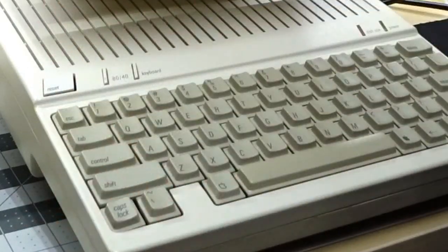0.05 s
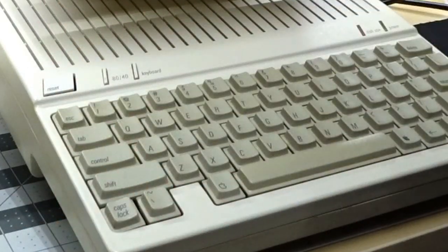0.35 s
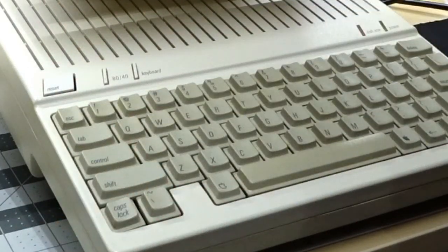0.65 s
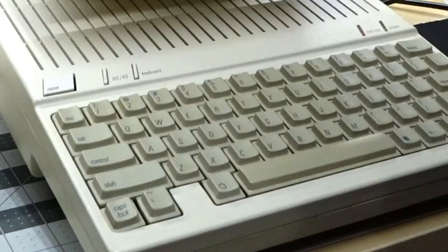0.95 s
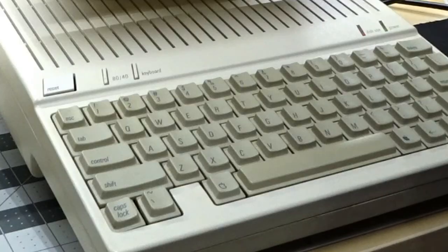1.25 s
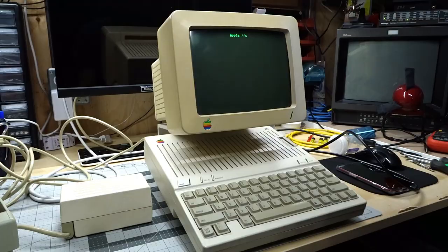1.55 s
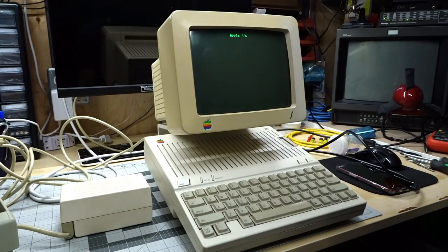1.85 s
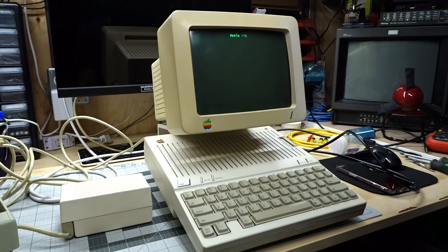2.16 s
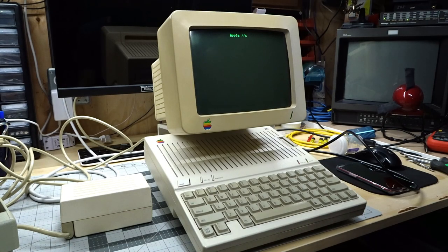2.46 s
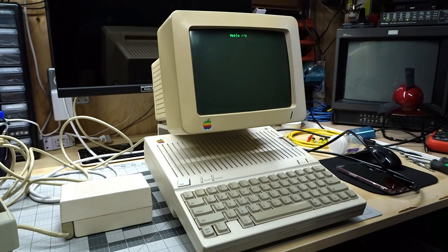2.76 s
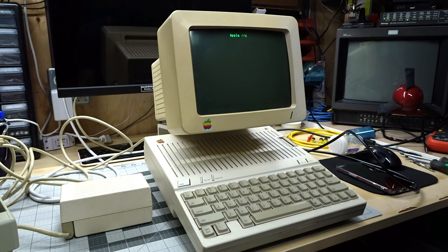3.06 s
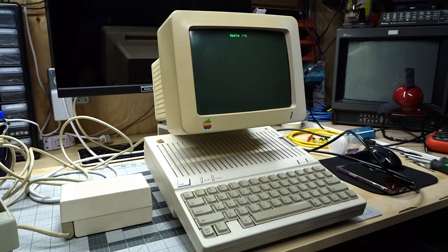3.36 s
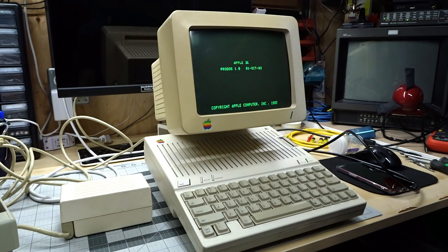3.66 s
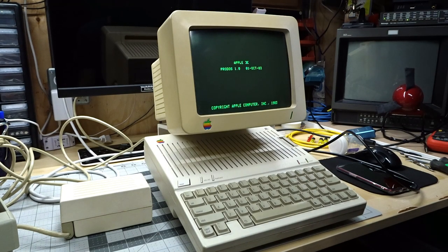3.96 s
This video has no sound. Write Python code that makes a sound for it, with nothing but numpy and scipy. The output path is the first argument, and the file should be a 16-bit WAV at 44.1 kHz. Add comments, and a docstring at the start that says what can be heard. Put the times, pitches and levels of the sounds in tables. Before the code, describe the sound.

Rapid mechanical knocking from an old computer's disk drive stops, leaving a faint hum.

```python
"""A floppy drive knocks its head against the end stop thirteen times a second. Each knock rings the
plastic case and is followed by a lighter click as the stepper slips back. Then the disk just spins with
a low hum; the head slides softly from track to track and clicks twice, between a low bump and a faint
rustle. Small, dry workshop: steady noise, desk reflections, faint reverberation."""
import sys
import numpy as np
from scipy import signal
from scipy.fft import rfft, irfft
from scipy.io import wavfile
from scipy.ndimage import uniform_filter1d

SR = 44100
rng = np.random.default_rng(int(sys.argv[2]) if len(sys.argv) > 2 else 0)


def transcribe(u):
    """Save the signal u as a 16-bit wav file named by the first command-line argument.

    u: samples, shape (n,) or (channels, n), limited to [-1, 1]; the rate is SR.
    q: integer samples, one column per channel.
    """
    v = np.clip(np.atleast_2d(u).T, -1, 1)
    q = np.round(v * 32767).astype(np.int16)
    wavfile.write(sys.argv[1], SR, q)


N = 176400

# drive and case modes (frequency [Hz], knock level [dB], slip level [dB], t60 [s], rise [s])
BODY_MODES = [(178, -83, -88, 0.13, 0.0067), (309.4, -48, -65, 0.22, 0.0076),
              (407.2, -39, -78, 0.13, 0.0055), (702.4, -34.5, -56, 0.19, 0.0098),
              (776, -44.5, -52, .1, 0.0061), (816.6, -47, -47, 0.18, 0.0091), (878, -61, -52, 0.049, 0.018),
              (962.5, -35, -67, 0.043, 0.0035), (1044.3, -36.5, -35.5, 0.11, 0.009),
              (1585, -37.5, -48, 0.066, 0.0086), (1648, -75, -40, 0.064, 0.0024),
              (2648, -44, -52, 0.095, 0.00065), (2970, -48.5, -64, 0.081, 0.00085),
              (3060, -35, -64, 0.053, 0.0017), (3260, -24, -44, 0.025, 0.0011),
              (3482, -45.5, -54.5, 0.022, 0.00042), (3950, -38.5, -49, 0.045, 0.00082),
              (4354, -40.5, -53, 0.054, 0.0015), (5230, -66, -47.5, 0.023, 0.00042),
              (5645, -47.5, -41, 0.02, 0.00041), (7590, -31, -67, 0.0069, 0.00013)]
# dense ring spectra (frequency [Hz], relative density [dB])
KNOCK_SPECTRUM = [(100, -29), (230, -11.5), (450, -4.5), (600, -4), (850, 5.5), (1080, 1.5), (1250, -9.5),
                  (1500, 1), (2000, -10), (2600, -5), (3200, -7.5), (4200, -2), (4800, -15.5), (5600, -7.5),
                  (6900, -22), (7900, -11), (9300, -14), (11000, -20.5)]
SLIP_SPECTRUM = [(100, -10.5), (250, -13.5), (480, 2.5), (620, 0.5), (900, 6), (1250, 1), (1650, 2.5),
                 (2100, -0.5), (3000, -0.5), (4100, 6.5), (4800, 0.5), (5600, 1.5), (6600, -5),
                 (7400, -4.5), (8500, -10.5), (11000, -13)]
CLICK_SPECTRUM = [(200, -15), (1200, -5), (1800, -19), (2300, -1), (3300, -5.5), (3900, -16.5),
                  (4500, -8.5), (5300, -29), (11000, -26)]
# dense ring decay by band (frequency [Hz], t60 [s], rise [s])
CASE_DECAY = [(306, 0.18, 0.015), (850, 0.091, 0.0017), (1600, 0.15, .003), (3320, 0.15, 0.00051),
              (5700, 0.088, 0.001), (10000, 0.13, 0.0009)]
CLICK_DECAY = [(500, .05, 0.00056), (4000, 0.07, 0.00012)]
# part of the ring that changes per blow (frequency [Hz], power share [0-1])
BLOW_VARIATION = [(500, .06), (3000, 0.041), (9000, 0.28)]
# tones of the spinning drive (frequency [Hz], rms level [dB])
SPIN_TONES = [(119, -82), (177.6, -74.5), (480, -84.5), (775, -84), (2353, -90.5), (2460, -82.5),
              (3192, -86), (4554, -88)]
# track-to-track moves (centre time [s], length [s], level [dB])
HEAD_SLIDES = [(1.545, 0.099, -64), (1.855, 0.18, -68), (2.327, 0.044, -61.5), (2.792, 0.081, -62),
               (3.263, 0.096, -62.5)]
# double click (time [s], tick level [dB], rattle level [dB], ring level [dB])
HEAD_CLICKS = [(3.6011, -40, -63.5, -44), (3.6187, -45, -65.5, -43)]
# noise and echo spectra (frequency [Hz], relative density [dB])
FLOOR_SPECTRUM = [(15, -30), (25, -5), (70, -8), (100, -6), (150, -2.5), (190, 2), (260, -4), (480, -4.5),
                  (560, -7), (690, -2), (950, -11), (1200, -12.5), (1550, -11), (2100, -12), (2450, -10),
                  (2850, -12.5), (3200, -11.5), (3900, -16.5), (5600, -16), (7500, -20), (11000, -24.5)]
SLIDE_SPECTRUM = [(200, -18), (450, 5.5), (560, -4), (720, 7), (900, -1), (1080, 2), (1300, -10),
                  (1800, -1.5), (2400, -7.5), (4400, -8.5), (7000, -18), (11000, -36)]
RUSTLE_SPECTRUM = [(500, -5), (2000, -13), (3000, 2), (4000, -12), (11000, -25)]
ECHO_SPECTRUM = [(150, 7), (700, -2), (1500, 2.5), (3000, -5), (6000, 3.5), (10000, 2.5)]
# stereo width of rings and of diffuse sound (frequency [Hz], side minus mid [dB])
RING_WIDTH = [(100, -13), (500, -12.5), (1000, -17), (2000, -6.5), (4000, -5), (10000, -2)]
DIFFUSE_WIDTH = [(60, -16), (300, -5), (1000, -0.5), (3000, -1.5), (10000, -0.5)]

RING_SAMPLES = 8192
RING_BINS_HZ = np.fft.rfftfreq(RING_SAMPLES, 1 / SR)


def undb(db):
    """Decibels to gain."""
    return 10 ** (np.asarray(db) / 20)


def lookup(table, hz, column=1):
    """Table column, interpolated over log frequency."""
    rows = np.array(table, float)
    return np.interp(np.log(hz + 1e-9), np.log(rows[:, 0]), rows[:, column])


def add(out, time_s, sound):
    """Mix a sound in at a time."""
    start = int(round(time_s * SR))
    lo, hi = max(start, 0), min(start + sound.shape[-1], N)
    out[:, lo:hi] += sound[..., lo - start:hi - start]


def wander(rate_hz):
    """Smooth random drift, spread near 1."""
    hold = int(SR / rate_hz)
    steps = np.repeat(rng.standard_normal(N // hold + 1), hold)
    return uniform_filter1d(steps, hold)[:N] * np.sqrt(3 / 2)


def swell(centre_s, length_s):
    """Gaussian rise and fall."""
    return np.exp(-2 * (2 * (np.arange(N) / SR - centre_s) / length_s) ** 2)


def decay(t60_s, rise_s, size=RING_SAMPLES):
    """Build-up, then exponential decay."""
    t = np.arange(size) / SR
    return (1 - np.exp(-t / rise_s)) * np.exp(-np.log(1000) * t / t60_s)


def stereo_bins(width, size=RING_SAMPLES):
    """Stereo white-noise spectrum, narrower in the bass."""
    mid, side = rfft(rng.standard_normal((2, size)))
    side_gain = undb(lookup(width, np.fft.rfftfreq(size, 1 / SR)))
    return mid + np.array([[1], [-1]]) * side * side_gain


def noise(spectrum, size=N):
    """Diffuse coloured noise, mid rms 1."""
    gain = undb(lookup(spectrum, np.fft.rfftfreq(size, 1 / SR)))
    x = irfft(stereo_bins(DIFFUSE_WIDTH, size) * gain, size)
    return x / x.mean(0).std()


def mode(hz, t60_s, rise_s, stereo_lag_s=2.5e-5):
    """One struck resonance, left slightly ahead of right."""
    t = np.arange(RING_SAMPLES) / SR + np.array([[stereo_lag_s], [-stereo_lag_s]]) / 2
    return np.sin(2 * np.pi * hz * t) * decay(t60_s, rise_s)


def dense_ring(white_bins, spectrum, band_decay, crack, crack_t60_s=0.018, crack_hz=2500):
    """Countless small modes, decaying by band; energy of 50 ms at rms 1."""
    edges_hz = np.geomspace(240, 12000, 44) - 160
    out = 0
    for lo, hi in zip(edges_hz, edges_hz[1:]):
        hz = (lo + hi) / 2
        t60_s, rise_s = lookup(band_decay, hz), lookup(band_decay, hz, column=2)
        # first contact, strongest in the treble
        contact = crack * decay(crack_t60_s, rise_s) / (1 + (crack_hz / hz) ** 2)
        in_band = (RING_BINS_HZ >= lo) & (RING_BINS_HZ < hi)
        band = irfft(white_bins * in_band) * (decay(t60_s, rise_s) + contact)
        gain = undb(lookup(spectrum, hz)) * np.sqrt(hi - lo)
        out += gain * band / band.std(axis=1, keepdims=True)
    return out / np.sqrt(np.sum(out ** 2) / 2 / (0.05 * SR))


def case_blows(spectrum, ring_db, modes_db, crack, delay_s=0, first_s=-0.031, period_s=0.07718):
    """Regular, nearly identical blows ring the case; the treble varies most."""
    out = np.zeros((2, N))
    shared = stereo_bins(RING_WIDTH)
    fresh_share = lookup(BLOW_VARIATION, RING_BINS_HZ)
    polarity = (-1) ** np.arange(len(BODY_MODES))  # adjacent modes swing opposite ways
    for k in range(16):
        white_bins = np.sqrt(1 - fresh_share) * shared + np.sqrt(fresh_share) * stereo_bins(RING_WIDTH)
        scatter_db = 0.5 * rng.standard_normal(len(BODY_MODES) + 1)
        ring = undb(ring_db + scatter_db[-1]) * dense_ring(white_bins, spectrum, CASE_DECAY, crack)
        gains = polarity * undb(modes_db + scatter_db[:-1])
        tones = sum(gain * mode(hz, t60_s, rise_s)
                    for gain, (hz, _, _, t60_s, rise_s) in zip(gains, BODY_MODES))
        add(out, first_s + k * period_s + delay_s, ring + tones)
    return out


def end_stop_clatter():
    """The head hits its stop, then the stepper slips back."""
    _, knock_db, slip_db, _, _ = np.array(BODY_MODES).T
    knocks = case_blows(KNOCK_SPECTRUM, ring_db=-39.5, modes_db=knock_db, crack=2.3)
    slips = case_blows(SLIP_SPECTRUM, ring_db=-48, modes_db=slip_db, crack=1, delay_s=0.0444)
    return knocks + slips


def spin_hum(flutter_db=1.2, drift_hz=1.0):
    """Wavering tones of the spinning drive."""
    out = np.zeros(N)
    for hz, rms_db in SPIN_TONES:
        amplitude = np.sqrt(2) * undb(rms_db + flutter_db * wander(rate_hz=11))
        cycles = np.cumsum(hz + drift_hz * wander(rate_hz=15)) / SR
        out += amplitude * np.sin(2 * np.pi * cycles)
    return out


def noise_floor(level_db=-65, flicker_db=0.47):
    """Steady noise of workshop and spinning disk."""
    return noise(FLOOR_SPECTRUM) * undb(level_db + flicker_db * wander(rate_hz=24.96))


def head_slides():
    """The head slides between tracks: soft swells of noise."""
    envelope = sum(undb(db) * swell(centre_s, length_s) for centre_s, length_s, db in HEAD_SLIDES)
    return noise(SLIDE_SPECTRUM) * envelope


def bump(time_s=3.38, level_db=-48.5):
    """One soft, low bump."""
    out = np.zeros((2, N))
    add(out, time_s, undb(level_db) * mode(hz=177, t60_s=0.071, rise_s=0.001))
    return out


def head_clicks():
    """Two sharp head clicks, each a tick, a rattle and a lower ring."""
    out = np.zeros((2, N))
    for time_s, tick_db, rattle_db, ring_db in HEAD_CLICKS:
        tick = mode(hz=2480, t60_s=0.0077, rise_s=0.0001)
        rattle = dense_ring(stereo_bins(RING_WIDTH), CLICK_SPECTRUM, CLICK_DECAY, crack=1.1)
        ring = mode(hz=782, t60_s=0.058, rise_s=0.0019)
        add(out, time_s, undb(tick_db) * tick + undb(rattle_db) * rattle + undb(ring_db) * ring)
    return out


def rustle(level_db=-69.5):
    """Faint rustle after the clicks."""
    return noise(RUSTLE_SPECTRUM) * undb(level_db) * swell(centre_s=3.672, length_s=0.071)


def reflections(t60_s, rise_s):
    """Diffuse decaying echoes, unit energy."""
    tail = noise(ECHO_SPECTRUM, size=SR) * decay(t60_s, rise_s, size=SR)
    return tail / np.sqrt(np.sum(tail ** 2) / 2)


def room(direct, desk_db=-17.5, reverb_db=-15.5):
    """Add quick desk reflections and faint workshop reverberation."""
    desk = undb(desk_db) * reflections(t60_s=0.14, rise_s=0.01)
    reverb = undb(reverb_db) * reflections(t60_s=1, rise_s=0.0097)
    return direct + signal.fftconvolve(direct, desk + reverb, axes=1)[:, :N]


def scene():
    """The drive in its workshop."""
    events = end_stop_clatter() + head_slides() + bump() + head_clicks() + rustle()
    return room(events) + spin_hum() + noise_floor()


def record(dry):
    """Steep elliptic low-pass."""
    cutoff_hz = 11200
    return signal.sosfilt(signal.ellip(10, 0.2, 60, cutoff_hz, fs=SR, output="sos"), dry)


dry = scene()
out = record(dry)
transcribe(out)
```